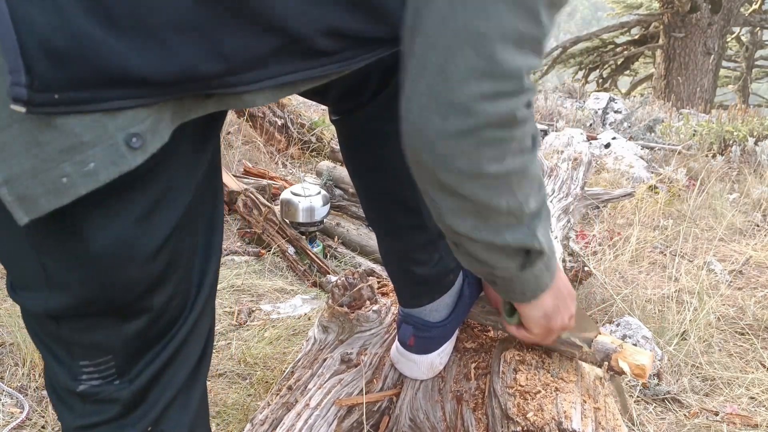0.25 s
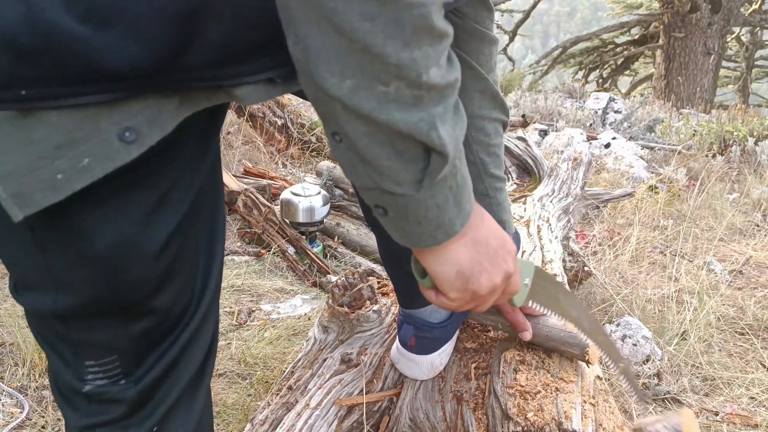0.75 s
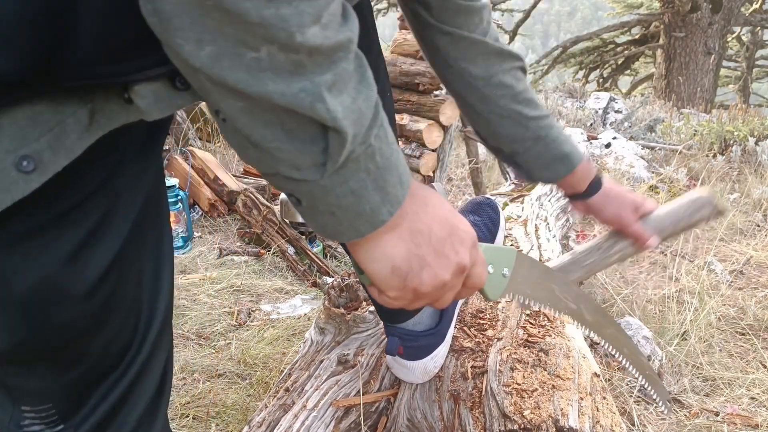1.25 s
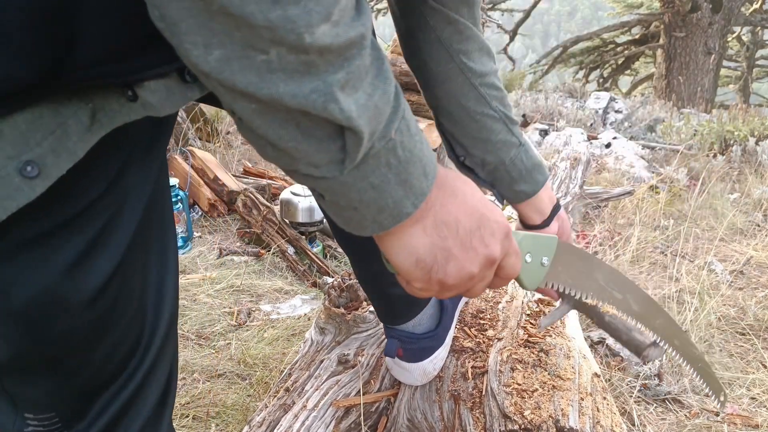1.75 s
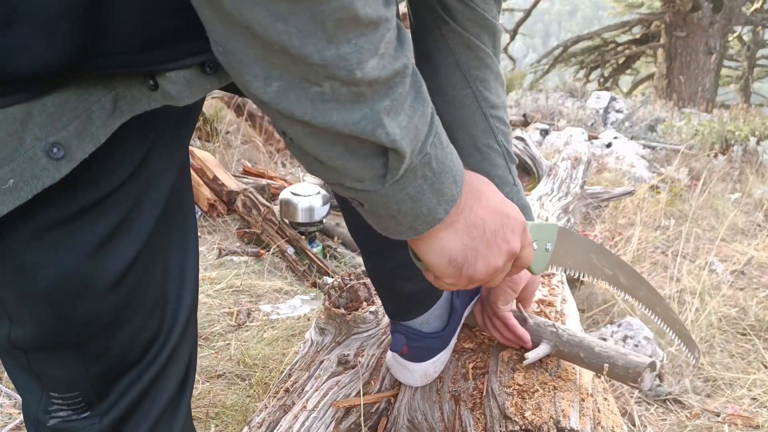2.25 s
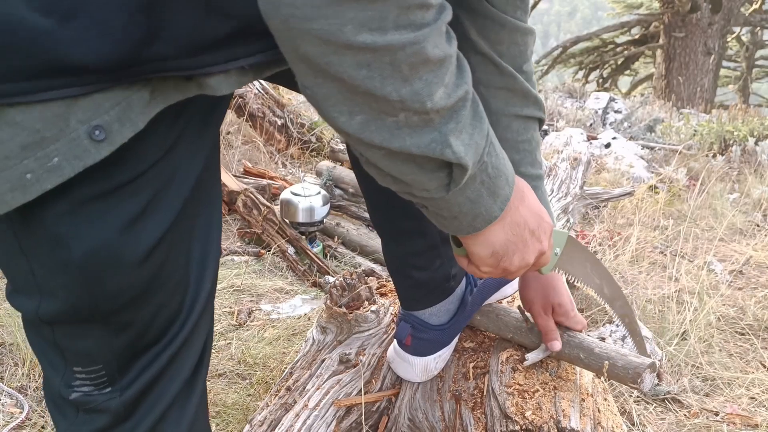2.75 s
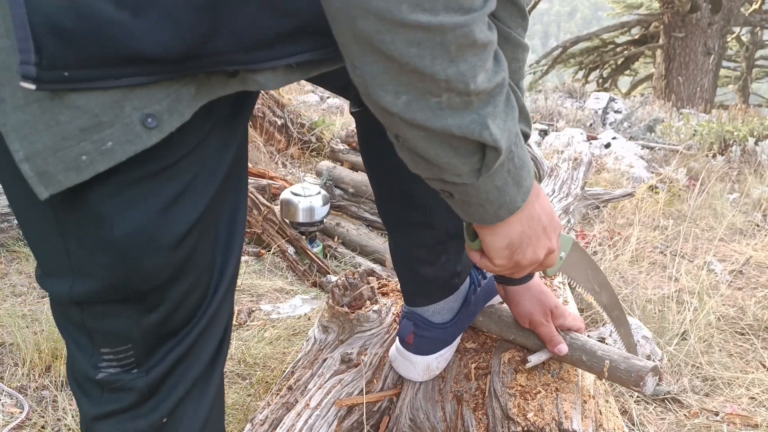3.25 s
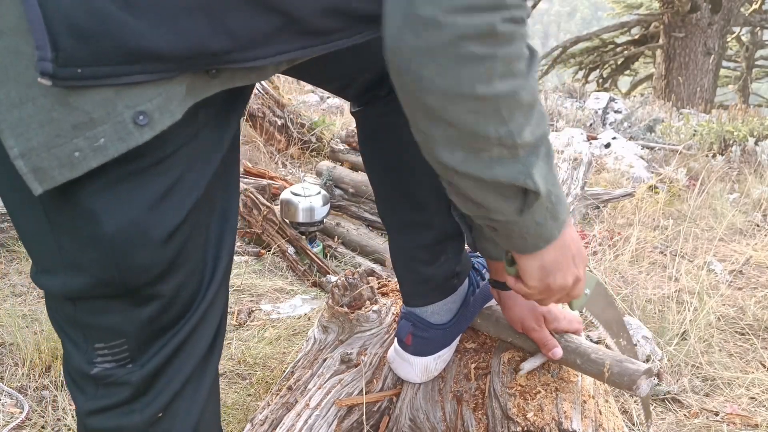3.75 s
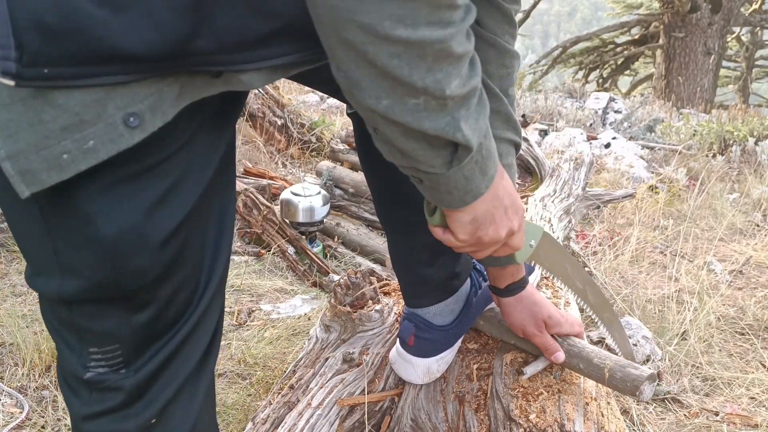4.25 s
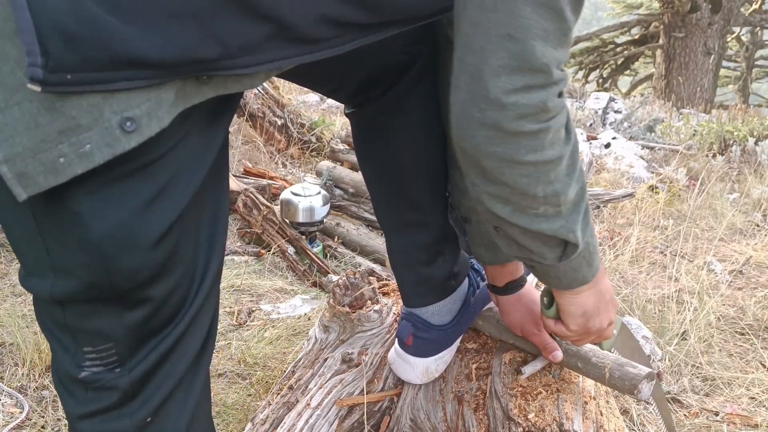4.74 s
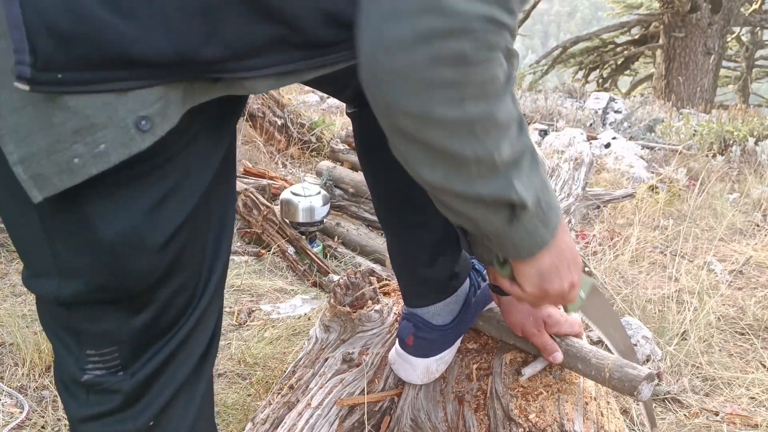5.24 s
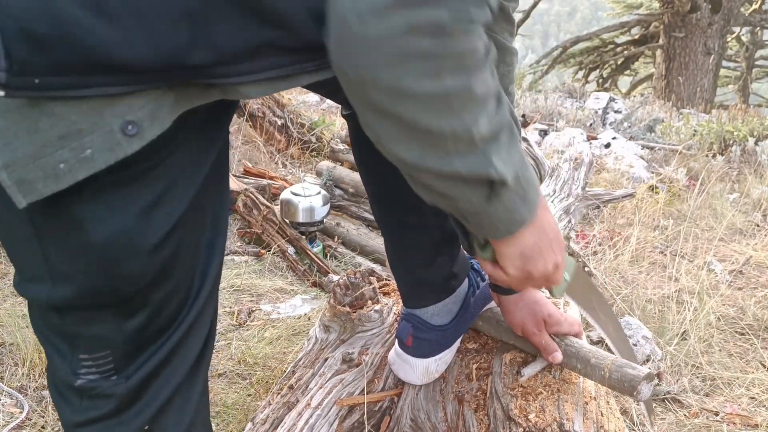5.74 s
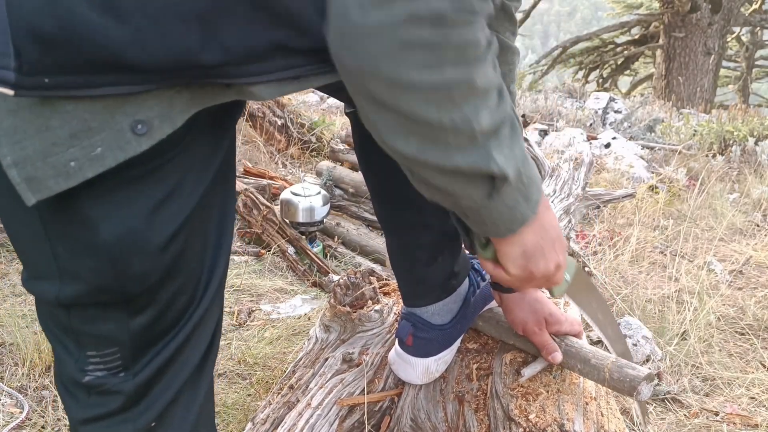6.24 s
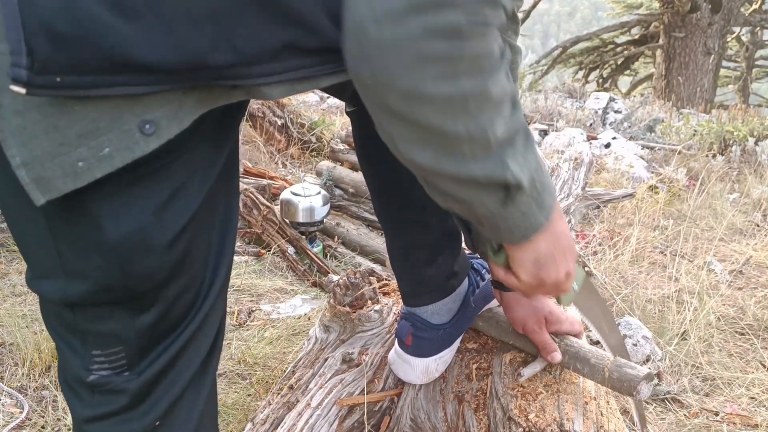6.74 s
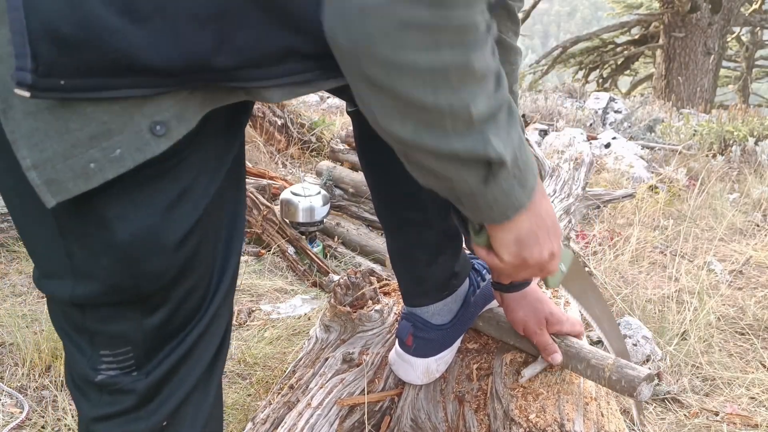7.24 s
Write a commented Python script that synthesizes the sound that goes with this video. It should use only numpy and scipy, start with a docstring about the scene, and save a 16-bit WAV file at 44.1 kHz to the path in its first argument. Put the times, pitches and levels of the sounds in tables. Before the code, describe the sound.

A toothy saw stroke, a weaker return, then a sharp crack as the thin stick gives way. Light knocks and dry bark scrapes follow while the wood is repositioned on the log. Near silence, with only low wind and faint airy hiss, then tentative scrapes and steady, faster sawing: strong rasping pulls that hammer the stick on the log, softer hissing pushes. Dry open air, close stereo microphones.

```python
"""Pruning saw on a thin stick

Outdoors, a stereo pair of microphones stands close to a log; a curved saw cuts a thin stick held down on it.
The first cut ends as the stick cracks off; the stick is turned and laid down again, and a second cut begins.
Teeth tear fibres: grains of noise, pulsed by each tooth, ring the steel blade and the wood.
On the pull the teeth also hammer the stick against the log. Light wind, made of coloured noise, rumbles underneath."""
import sys
import numpy as np
from scipy import signal
from scipy.fft import rfft, irfft
from scipy.io import wavfile
from scipy.ndimage import uniform_filter1d, map_coordinates

SR = 44100
rng = np.random.default_rng(int(sys.argv[2]) if len(sys.argv) > 2 else 0)


def wav_record(signal):
    """Record a signal, one row per channel, as 16-bit PCM in the file named by sys.argv[1]."""
    frames = np.transpose(np.atleast_2d(signal))
    bounded = np.clip(frames, -1, 1)
    # unit amplitude maps onto the largest positive 16-bit level
    quanta = np.round(bounded * 32767).astype(np.int16)
    wavfile.write(sys.argv[1], SR, quanta)


N = 330309
TIME = np.arange(N) / SR  # seconds
RING = 8192  # length of responses and bursts, samples
SECOND_CUT_S = 2  # from here on the settings of the second cut apply


def undb(db):
    """Turn decibels into an amplitude factor."""
    return 10 ** (np.asarray(db) / 20)


def unit(response):
    """Scale a response so that it keeps the power of white noise."""
    return response / np.sqrt(np.sum(response ** 2))


def through(x, response):
    """Pass a force through a response."""
    return signal.oaconvolve(x, response)[:len(x)]


def colour(points):
    """Causal, minimum-phase response with a spectrum of (Hz, dB) points."""
    hz, db = np.transpose(points)
    grid = np.maximum(np.arange(RING // 2 + 1) * SR / RING, 1)
    level_db = np.interp(np.log(grid), np.log(hz), db)
    cepstrum = irfft(np.log(undb(level_db)))
    # folding the cepstrum puts the energy as early as possible
    cepstrum[1:RING // 2] *= 2
    cepstrum[RING // 2 + 1:] = 0
    return unit(irfft(np.exp(rfft(cepstrum))))


def modes(rows):
    """Response of damped resonances (Hz, width Hz, dB); a wider one dies away sooner."""
    t = TIME[:RING]
    response = np.zeros(RING)
    for hz, width, db in rows:
        decay = np.exp(-np.pi * width * t)
        response += undb(db) * width * decay * np.cos(2 * np.pi * hz * t)
    return unit(response)


def shifting(x, rows, wander_db, count=4):
    """Resonances whose strengths change, in groups, as the point of contact moves."""
    rows = np.array(rows)
    power = rows[:, 1] * undb(rows[:, 2]) ** 2
    total = np.zeros(len(x))
    for k in range(count):
        share = np.sqrt(power[k::count].sum() / power.sum())
        force = x * undb(wander_db * walk(22))
        total += share * through(force, modes(rows[k::count]))
    return total


def contact(hz):
    """Broad response of bark and wood around a centre."""
    return colour([(hz / 6, -22), (hz / 1.62, -2), (hz * 1.14, 0), (hz * 2.0, -21)])


def walk(rate):
    """Chance wander: random values joined by straight lines, rate of them per second, spread near 1."""
    steps = np.random.default_rng(rng.integers(2 ** 31)).standard_normal(N // 20)
    return np.interp(TIME * rate, np.arange(len(steps)), steps)


def grains(per_s, spread_db):
    """Dense tiny fractures of uneven size, rms 1."""
    happens = rng.random(N) < per_s / SR
    sign = rng.choice([-1, 1], N)
    size = undb(spread_db * np.minimum(rng.standard_normal(N), 3))
    x = happens * sign * size
    return x / np.std(x)


def burst(t60):
    """A puff of noise that fades by 60 dB in t60 seconds."""
    return rng.standard_normal(RING) * np.exp(-np.log(1000) * TIME[:RING] / t60)


def tick(t60, sharpness=8):
    """A first hard touch, then the crumbling of bark."""
    force = burst(t60)
    force[0] = sharpness
    return force


def peaked(sound, db):
    """Scale a short sound to a peak level."""
    return undb(db) * sound / np.abs(sound).max()


def add(track, s, sound):
    """Mix a short sound in at a time."""
    start = int(s * SR)
    track[start:start + len(sound)] += sound[:N - start]


def between(start, end):
    """True from one time to another."""
    return (TIME >= start) & (TIME < end)


def progress(start, end, fastest):
    """Share of a stroke that is done (0-1); half is done at the fastest moment."""
    return np.interp(TIME, [start, start + fastest * (end - start), end], [0, .5, 1])


def place(x, left_db, scatter_db, scatter_t60=0.055, lag_s=0.00011, motion_rate=13):
    """Two microphones, the left one nearer; log, legs and moving arm scatter the sound differently to each."""
    no_bass = signal.butter(1, 600, "high", fs=SR)
    microphones = []
    for direct in x, np.interp(TIME - lag_s, TIME, x):
        paths = np.array([through(x, unit(signal.lfilter(*no_bass, burst(scatter_t60)))) for _ in range(3)])
        # the mix of the three paths keeps changing, at constant power
        shares = np.array([walk(motion_rate) for _ in paths])
        scatter = np.sum(shares * paths, axis=0) / np.linalg.norm(shares, axis=0)
        microphones.append((direct + undb(scatter_db) * scatter) / np.hypot(1, undb(scatter_db)))
    return np.array(microphones) * undb([[left_db / 2], [-left_db / 2]])


def ambient(spectrum, side_db, left_db):
    """Noise of a given colour, partly the same at both microphones."""
    mid, side = (through(rng.standard_normal(N), colour(spectrum)) for _ in range(2))
    side = undb(side_db) * side
    return np.array([mid + side, mid - side]) * undb([[left_db / 2], [-left_db / 2]])


# Spectrum of the wind's rumble. Each row: frequency in Hz, relative level in dB.
RUMBLE = [(20, -20), (45, 0.5), (70, 0), (110, -12), (280, -11.5), (500, -22), (1200, -28), (4000, -51)]
# Spectrum of the open air's hiss. Each row: frequency in Hz, relative level in dB.
AIR = [(15, -53.5), (25, -16), (55, -4), (389, -6), (523, 0.5), (762, -5.5), (2120, -5), (2560, -6.5),
       (5140, -8.5), (7300, -8.5), (9300, -10.5), (15500, -29)]
# Gaps in which the recorder's noise suppressor mutes the rumble. Each row: start in seconds, end in seconds.
GAPS = [(1.44, 1.485), (1.77, 1.83), (2.305, 2.37), (2.45, 2.61), (2.67, 3.186)]
WIND_DB, AIR_DB = -53, -62  # middle levels, before the stereo spread


def outdoors():
    """Wind rumbles, muted now and then by the recorder's noise suppressor, over the faint hiss of open air."""
    passed = 1. - sum(between(start, end) for start, end in GAPS)
    wind_gain = uniform_filter1d(passed, size=900) * undb(WIND_DB + 0.89 * walk(16))
    wind = ambient(RUMBLE, side_db=-5.5, left_db=-4) * wind_gain
    air = ambient(AIR, side_db=-0.5, left_db=-1.8) * undb(AIR_DB + 2.0 * walk(6.33))
    return wind + air


# Bark rubbing under the hand and on the log.
# Each row: middle in seconds, level in dB, half length in seconds, centre in Hz.
RUBS = [(0.783, -54.5, 0.086, 5900), (1.018, -47, 0.027, 1190), (1.049, -42, 0.066, 6100),
        (1.195, -52, .03, 2190), (1.293, -47.5, .053, 4600), (1.972, -52, .03, 4470),
        (2.087, -58, .02, 3500), (2.232, -49, 0.041, 6440)]
# Stick, bark and blade touching. Each row: start in seconds, peak in dB before the microphones, centre in Hz.
TAPS = [(.909, -36, 7200), (.988, -28.5, 7000), (1.025, -21.5, 1280), (1.205, -26, 2940),
        (1.275, -26, 5590), (1.295, -22.5, 3000), (1.336, -33.5, 7800), (2.088, -38, 3660),
        (2.233, -46, 7600), (2.922, -43, 3570), (4.143, -34, 6340)]
# The stick set down on the log. Each row: start in seconds, peak in dB before the microphones.
THUDS = [(1.025, -27.5), (2.089, -41), (3.184, -37.5)]
# a faint rustle goes on while the stick is turned over: start and end
TURNING_S = (.78, 2.55)
# its middle level, its centre, and the spread of its level
RUSTLE_DB, RUSTLE_HZ, RUSTLE_PATCHY_DB = -69, 6440, 11.5


def handling():
    """Bark rustles under the hand; the stick taps the blade and lands on the log."""
    bark = grains(per_s=2400, spread_db=11.5)
    patches = between(*TURNING_S) * undb(RUSTLE_DB + RUSTLE_PATCHY_DB * walk(8.2))
    track = through(bark * patches, contact(RUSTLE_HZ))
    for s, db, half_length, hz in RUBS:
        during = np.abs(TIME - s) < half_length
        force = bark[during] * np.hanning(during.sum())
        add(track, s - half_length, through(force, contact(hz)) * undb(db))
    for s, db, hz in TAPS:
        add(track, s, peaked(through(tick(t60=.018), contact(hz)), db))
    landing = modes([(128, 31, 6), (280, 180, -10.0), (790, 210, -17), (1240, 540, -18)])
    for s, db in THUDS:
        add(track, s, peaked(through(tick(t60=0.013), landing), db))
    return place(track, left_db=0.3, scatter_db=-1.0)


# Fibres snapping in the cut, strongest as the stick breaks off.
# Each row: start in seconds, peak in dB before the microphones, time for the burst to fade by 60 dB in seconds.
CRACKS = [(0.5228, 1, .009), (0.5399, 2, .008), (0.5602, -9, .006), (0.671, -17, 0.014),
          (.697, -15.5, 0.032), (.753, -23.5, .04), (6.39, -19, .01), (6.549, -15, 0.0074),
          (6.756, -24.5, .008)]
# Spectrum of a snap. Each row: frequency in Hz, relative level in dB.
SNAP = [(200, -35.5), (1200, -4), (3000, 7.5), (5000, 7.5), (8500, 2.5), (11000, -28), (15000, -76)]


def cracks():
    """Bundles of fibres give way with a sharp snap."""
    track, snap = np.zeros(N), colour(SNAP)
    for s, db, t60 in CRACKS:
        add(track, s, peaked(through(burst(t60), snap), db))
    return place(track, left_db=4.5, scatter_db=-1.5)


# The saw is pulled, and cuts. Each row: start in seconds, end in seconds, strength of the rasp in dB,
# strength of the hammering on the log in dB.
PULLS = [(-.075, 0.199, -21, -49), (0.478, .785, -23, -52), (3.722, 4.07, -23.5, -30.5),
         (4.908, 5.205, -21.5, -28), (5.471, 5.743, -21, -28), (5.987, 6.246, -21, -25.5),
         (6.508, 6.737, -19.5, -27), (6.991, 7.252, -20, -28)]
# The saw is pushed back, and skims. Each row: start in seconds, end in seconds, strength of the rasp in dB.
PUSHES = [(0.196, 0.488, -32.5), (3.3, 3.699, -36), (4.527, 4.884, -32.5), (5.206, 5.47, -28),
          (5.743, 5.988, -26), (6.246, 6.502, -28), (6.736, 6.99, -28), (7.252, 7.51, -25.5)]
# the arm is fastest this far through a stroke (0-1); the rasp grows as a power of its speed
PULL_FASTEST, PULL_POWER = .41, 2.035
PUSH_FASTEST, PUSH_POWER = .6, 1.5
CREEP = 0.087  # share of full speed that is left, for the strength, as the arm turns


def arm():
    """Place of the cut along the blade (0 handle, 1 tip) and speed (0-1); the arm stops at each turn."""
    turned = sum(progress(start, end, PULL_FASTEST) for start, end, *_ in PULLS)
    turned = turned + sum(progress(start, end, PUSH_FASTEST) for start, end, *_ in PUSHES)
    return (1 - np.cos(np.pi * turned)) / 2, np.abs(np.sin(np.pi * turned))


def effort(rows, fastest, power, column=2):
    """Strength of strokes (start s, end s, levels dB): it grows as a power of their speed."""
    total = np.zeros(N)
    for row in rows:
        start, end = row[:2]
        during = between(start, end)
        speed = np.hypot(np.sin(np.pi * progress(start, end, fastest)[during]), CREEP)
        total[during] += undb(row[column]) * speed ** power
    return total


# The teeth snag, stall or slip free within a stroke. Each row: start in seconds, end in seconds,
# change of the blade's rasp in dB, change of the wood's rasp and of the hammering in dB.
SNAGS = [(0.354, 0.465, 3, 10.5), (0.496, 0.529, 12.5, 12.5), (0.653, .78, -2.5, -8),
         (3.859, 3.903, -7.5, -16.5)]
SNAG_EDGE_S = 0.023  # each change is smoothed over this long


def snagging(column):
    """Gain while the teeth snag or stall."""
    change = sum(row[column] * between(row[0], row[1]) for row in SNAGS)
    return undb(uniform_filter1d(change.astype(float), size=int(SNAG_EDGE_S * SR)))


def tearing(teeth, per_s, spread_db, pulsing, flicker_db, surge_db):
    """Fibres break in a spurt as each tooth passes; some teeth, and some runs of teeth, catch more."""
    tooth_pulse = 1 + pulsing * np.cos(2 * np.pi * teeth)
    catch = undb(flicker_db * walk(260) + surge_db * walk(60))
    force = grains(per_s, spread_db) * tooth_pulse * catch
    return force / np.std(force)


def hammering(teeth, scatter_db=5.0):
    """One uneven blow for each tooth; a tooth can only catch so hard."""
    strength = undb(scatter_db * np.minimum(rng.standard_normal(N), 1))
    blows = np.diff(np.floor(teeth), prepend=0) * strength
    # the wood gives way, so each blow is a short push rather than a click
    return uniform_filter1d(blows / np.std(blows), size=16)


# Resonances of the stick pressed against the log. Each row: frequency in Hz, width in Hz, relative level in dB.
LOG = [(141.3, 58, -1.5), (208, 15, 3), (293, 39, 1), (485.7, 19, 0.5), (595, 6.1, -4), (825, 23, -19),
       (992, 12.4, -3)]
# The loosely held stick groans on one note. Each row: start in seconds, end in seconds, strength in dB,
# frequency in Hz.
GROANS = [(-.03, 0.15, -36.5, 820), (0.336, 0.526, -36.5, 285), (3.386, 3.75, -41.5, 276.7),
          (3.735, 3.917, -31.5, 202)]
# early in a pull the teeth bite deep: place of the hardest bite (0-1), power of its arc
BITE_HARDEST, BITE_POWER = 0.32, 8.9
CHATTER_DB = -7  # lighter hammering through the whole pull, beside the bite


def stick_on_log(fibres, teeth, groan_width_hz=40):
    """Each pull hammers the stick on the log, far harder in the second cut; held loosely, it groans."""
    bite = effort(PULLS, BITE_HARDEST, BITE_POWER, column=3)
    chatter = undb(CHATTER_DB) * effort(PULLS, PULL_FASTEST, power=1.04, column=3)
    blows = undb(-2.0) * hammering(teeth) + undb(-7.0) * fibres
    low = through((bite + chatter) * snagging(column=3) * blows, modes(LOG))
    for start, end, db, hz in GROANS:
        force = fibres * effort([(start, end, db)], fastest=0.47, power=2.0)
        low += through(force, modes([(hz, groan_width_hz, 0)]))
    # the hammering carries little deep bass
    low = signal.sosfilt(signal.butter(2, 105, "high", fs=SR, output="sos"), low)
    return place(low, left_db=8.5, scatter_db=-0.5)


# Resonances of the held stick. Each row: frequency in Hz, width in Hz, relative level in dB.
STICK = [(283.6, 21, 8), (505.3, 27, -1), (609, 36, 1), (846, 57, -8), (1020, 75, -3.5), (1296.5, 39, 4),
         (1638, 41, -1), (1840, 82, -1), (1947, 19, -4.5), (2254, 63, -7.5), (2440, 61, 0), (2405, 14.6, 3),
         (2885, 120, -2), (3130, 23, -14), (3403, 49, 4.5), (3600, 28, -23), (4016, 39, -2)]
# Spectrum of the wood's rasp. Each row: frequency in Hz, relative level in dB.
WOOD_RASP = [(100, -34), (220, -8), (700, -10), (1200, -2), (1900, 5), (4000, 4.5), (7000, -8),
             (12000, -56)]
# force on the wood beside that on the blade: in a fresh cut, and sunk deep in the first one
FRESH_WOOD_DB, DEEP_WOOD_DB = -8, -6


def stick(rasp):
    """The wood rasps lower, through its own resonances, and louder when the cut is deep."""
    depth_gain = undb(np.where(TIME < SECOND_CUT_S, DEEP_WOOD_DB, FRESH_WOOD_DB))
    force = rasp * depth_gain * snagging(column=3)
    ringing = undb(-1.0) * shifting(force, STICK, wander_db=2.0)
    wood = ringing + undb(-2.5) * through(force, colour(WOOD_RASP))
    return place(wood, left_db=2.4, scatter_db=-1.5)


def blade_echo(x, position, near_s=0.000211, travel_s=0.000366, echo=0.19):
    """Waves return inverted from the end of the blade, so that notches slide with the stroke."""
    delay = near_s + travel_s * position + .00003 * walk(14)
    returned = map_coordinates(x, [np.arange(N) - delay * SR], order=3)
    return (x - echo * returned) / np.hypot(1, echo)


# Resonances of the blade. Each row: frequency in Hz, width in Hz, relative level in dB.
BLADE = [(4740, 51, -1.5), (5390, 280, -8.5), (5900, 290, -5), (6550, 160, -21), (7210, 124, 7.5),
         (7760, 55, -26), (8260, 69, 5.5), (9070, 79, 8)]
# Spectrum of the steel's rasp. Each row: frequency in Hz, relative level in dB.
STEEL_RASP = [(1500, -26.5), (2600, -4), (3500, 3.5), (5000, 1.5), (7500, 2), (9500, -6.5), (10500, -9),
              (11600, -26.5), (13700, -9.5), (15500, -20.5)]


def blade(rasp, position):
    """The steel rasps brightly, with shifting rings, and notches that move with the stroke."""
    force = blade_echo(rasp * snagging(column=2), position)
    ringing = undb(-11.5) * shifting(force, BLADE, wander_db=5)
    steel = undb(-1.34) * through(force, colour(STEEL_RASP)) + ringing
    # sunk deep in the first cut, the blade loses some of its highest hiss
    hiss = signal.sosfiltfilt(signal.butter(3, 10500, "high", fs=SR, output="sos"), steel)
    hiss_gain = undb(np.where(TIME < SECOND_CUT_S, -4.5, 1.5))
    return place(steel + hiss * (hiss_gain - 1), left_db=2.5, scatter_db=1.5)


TOOTH_HZ = 159.1  # teeth passing each second at full speed, on average


def saw():
    """Strokes drive the teeth; the teeth tear fibres and ring blade, stick and log."""
    position, speed = arm()
    # the pace of the teeth wanders, and drops to 62 % at a turn
    tooth_rate = TOOTH_HZ * (.62 + .38 * speed) * (1 + .07 * walk(110))
    teeth = np.cumsum(tooth_rate) / SR
    fibres = tearing(teeth, per_s=14000, spread_db=4.0, pulsing=0.29, flicker_db=1.5, surge_db=-0.28)
    strokes = effort(PULLS, PULL_FASTEST, PULL_POWER) + effort(PUSHES, PUSH_FASTEST, PUSH_POWER)
    rasp = fibres * strokes
    return stick_on_log(fibres, teeth) + stick(rasp) + blade(rasp, position)


def scene():
    """The open air, the handling of the stick, the cracks and the saw together."""
    return outdoors() + handling() + cracks() + saw()


def record(dry):
    """The recorder rounds the highest peaks and cuts everything above 15.6 kHz steeply."""
    top_cut = signal.ellip(10, .2, 70, 15600, fs=SR, output="sos")
    return signal.sosfilt(top_cut, np.tanh(dry))


dry = scene()
out = record(dry)
wav_record(out)
```